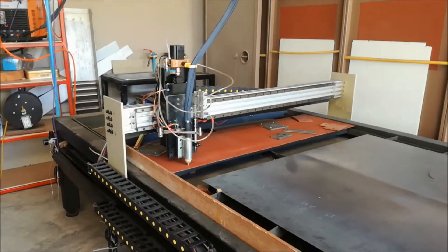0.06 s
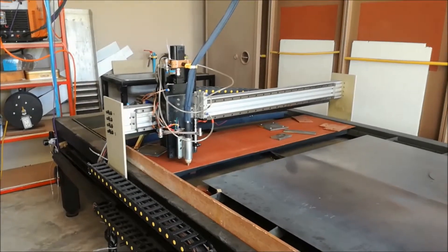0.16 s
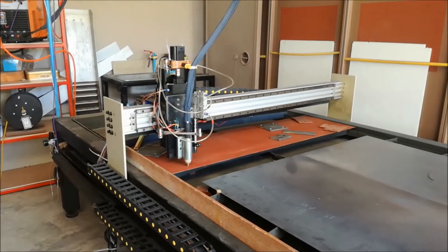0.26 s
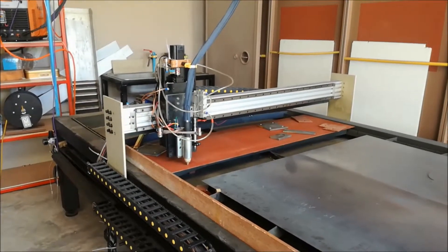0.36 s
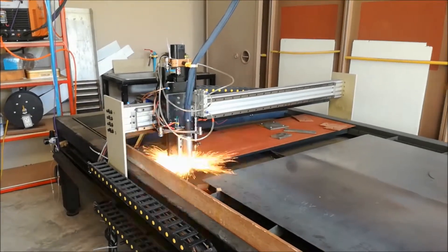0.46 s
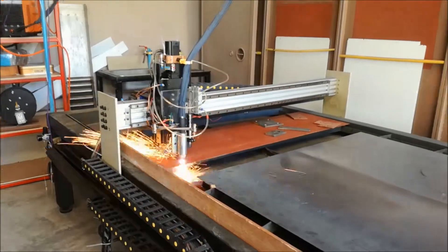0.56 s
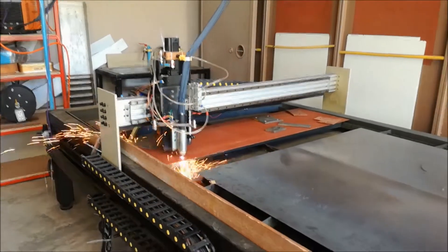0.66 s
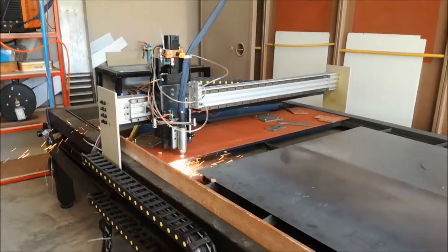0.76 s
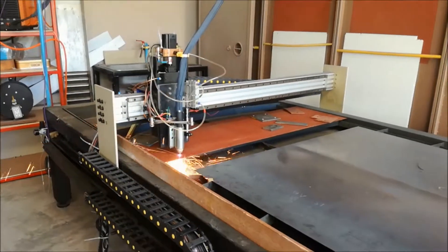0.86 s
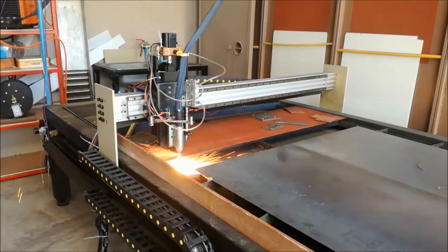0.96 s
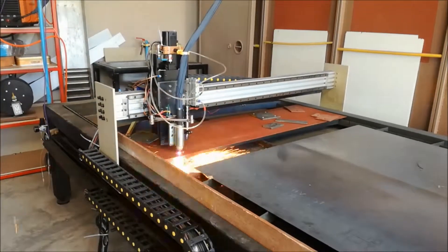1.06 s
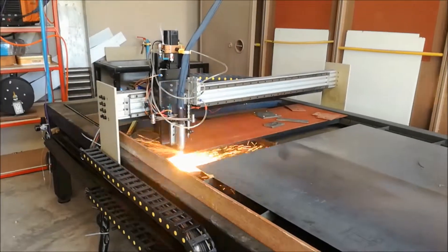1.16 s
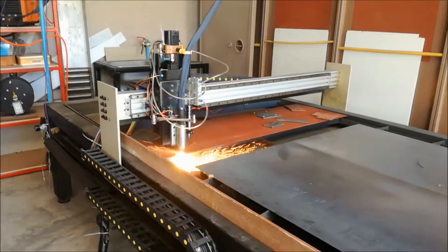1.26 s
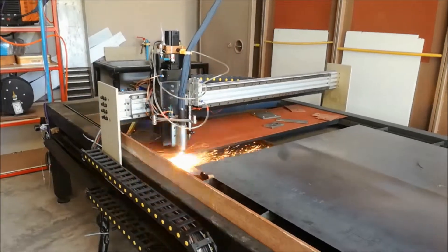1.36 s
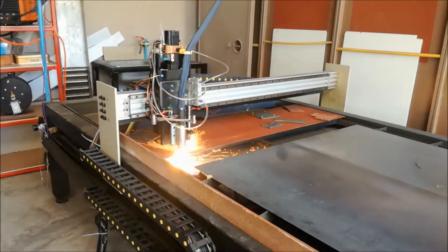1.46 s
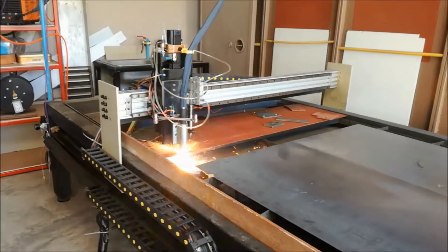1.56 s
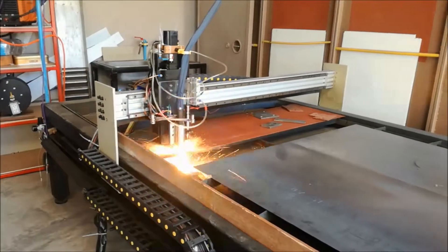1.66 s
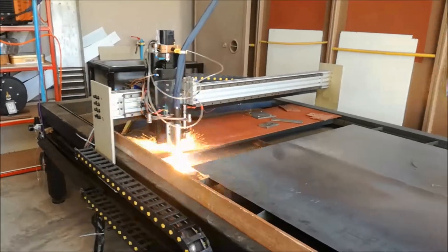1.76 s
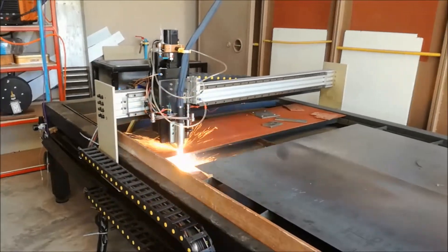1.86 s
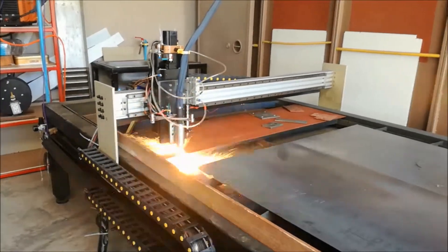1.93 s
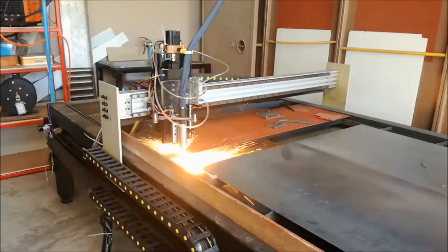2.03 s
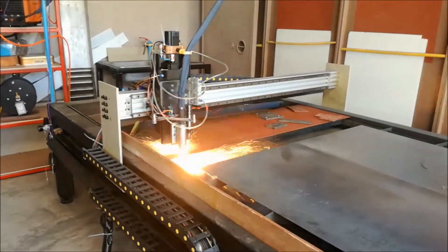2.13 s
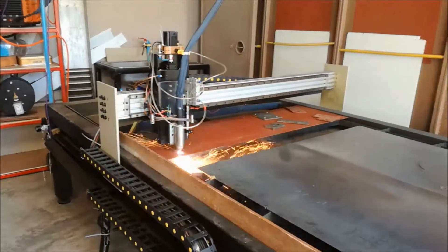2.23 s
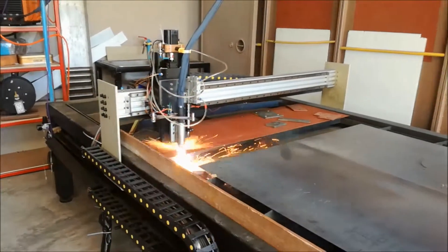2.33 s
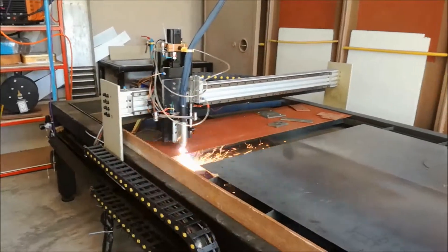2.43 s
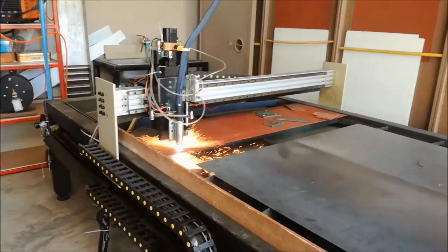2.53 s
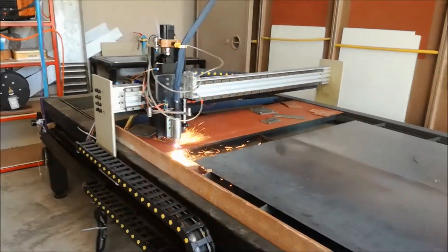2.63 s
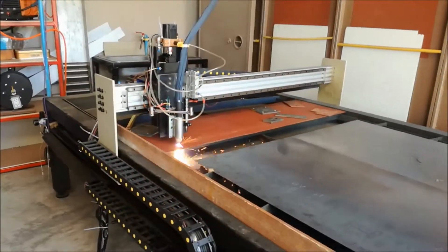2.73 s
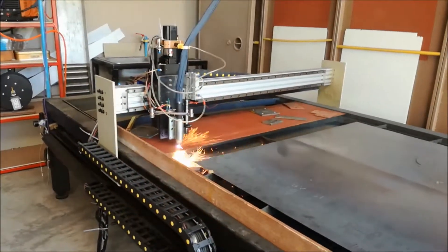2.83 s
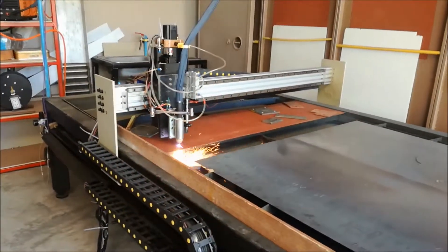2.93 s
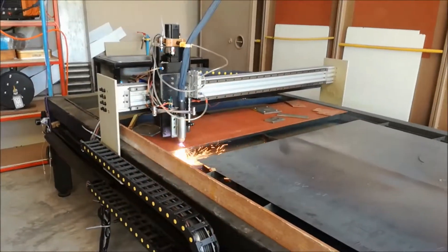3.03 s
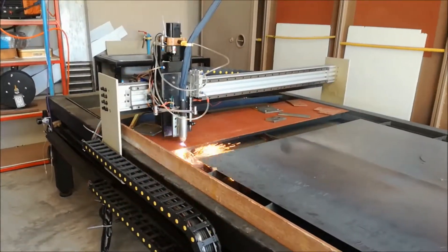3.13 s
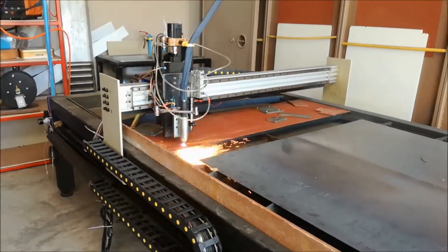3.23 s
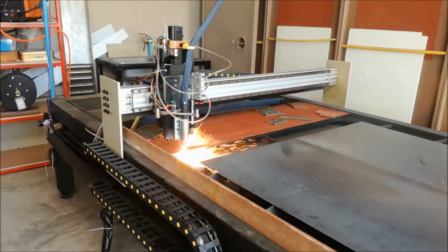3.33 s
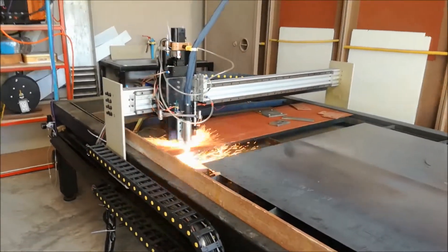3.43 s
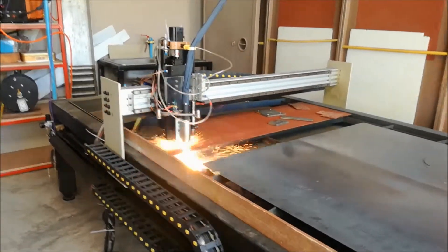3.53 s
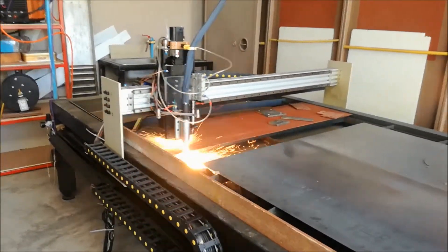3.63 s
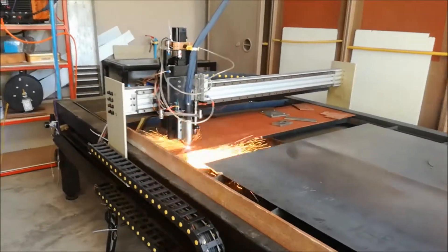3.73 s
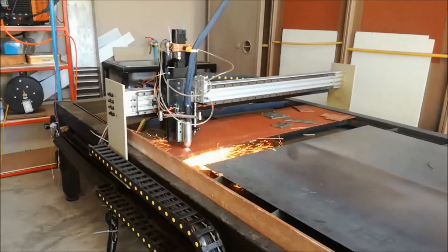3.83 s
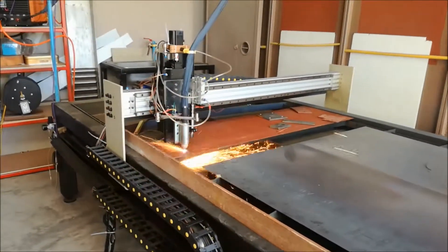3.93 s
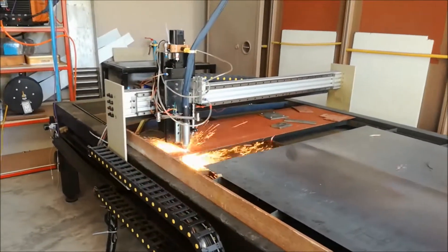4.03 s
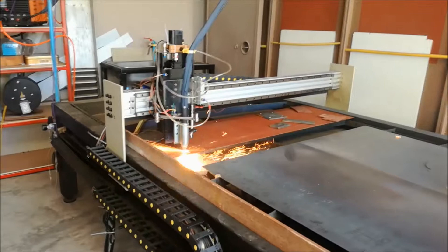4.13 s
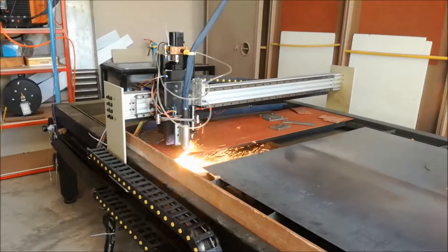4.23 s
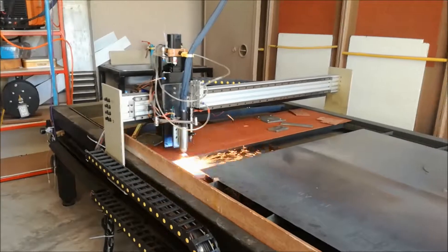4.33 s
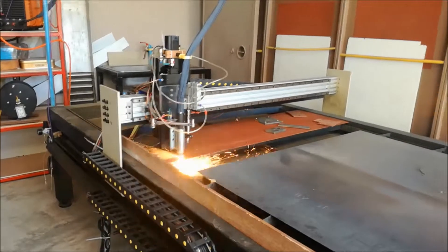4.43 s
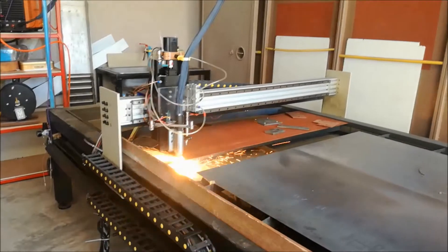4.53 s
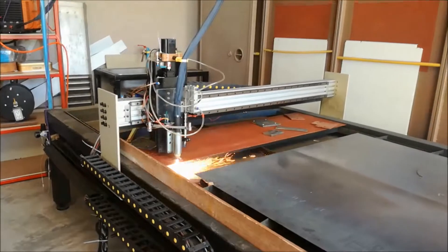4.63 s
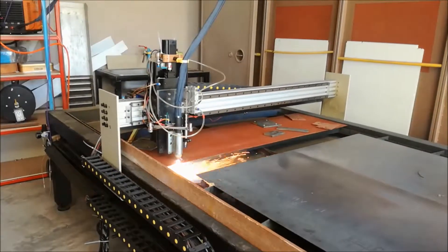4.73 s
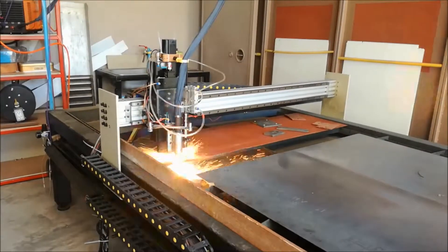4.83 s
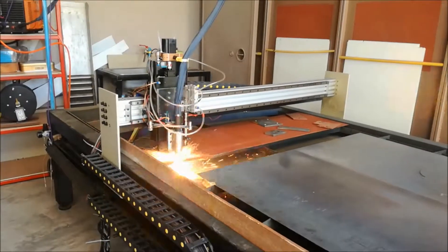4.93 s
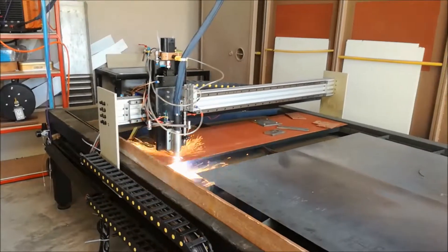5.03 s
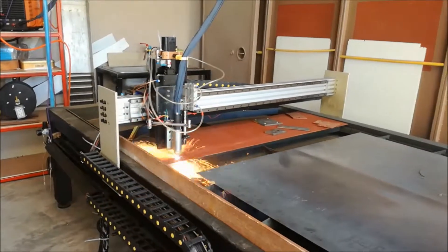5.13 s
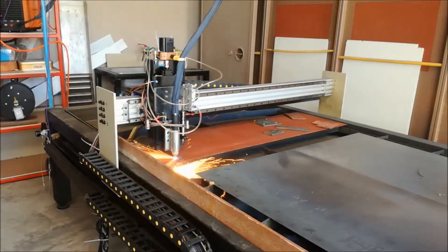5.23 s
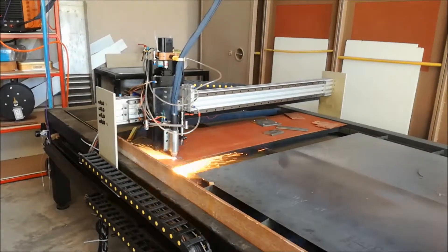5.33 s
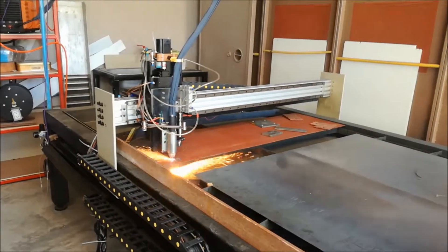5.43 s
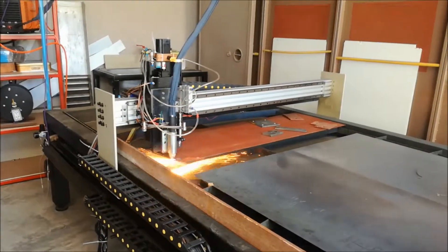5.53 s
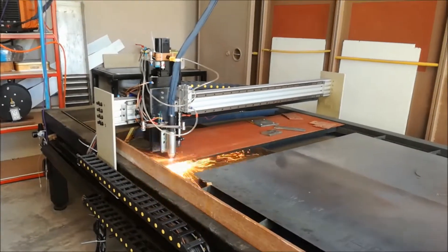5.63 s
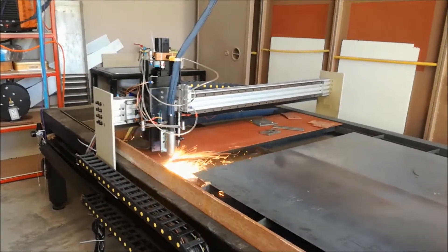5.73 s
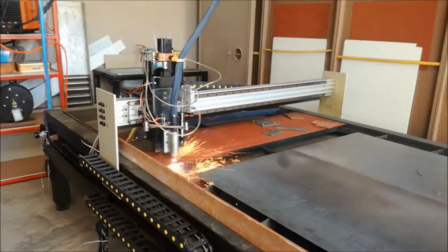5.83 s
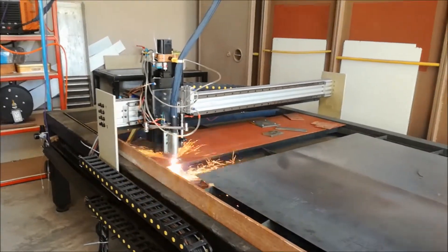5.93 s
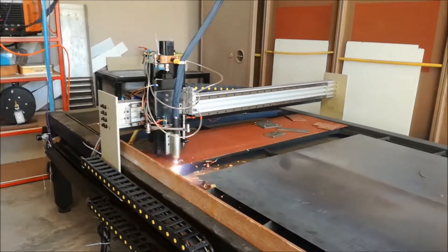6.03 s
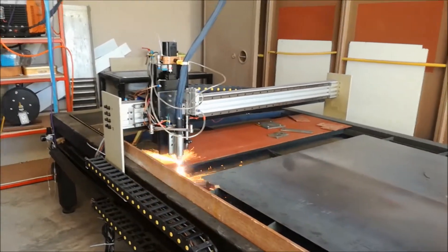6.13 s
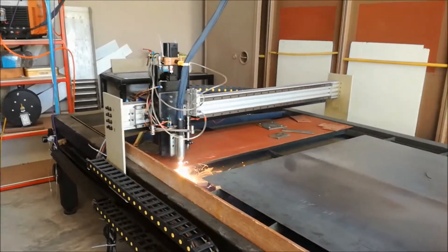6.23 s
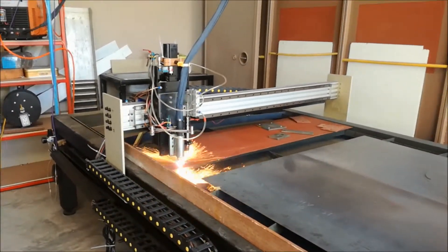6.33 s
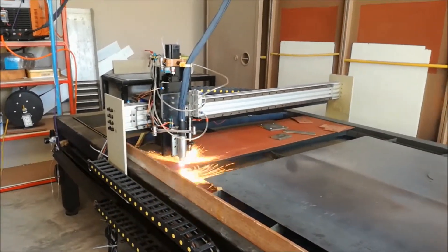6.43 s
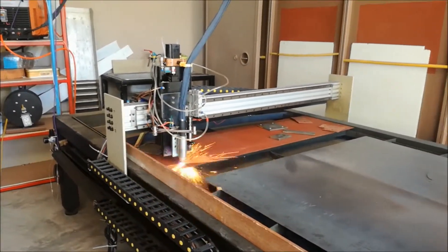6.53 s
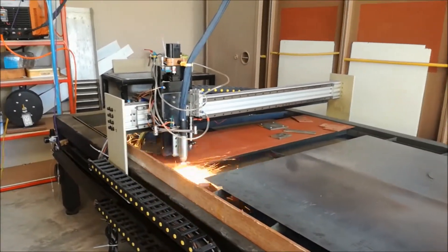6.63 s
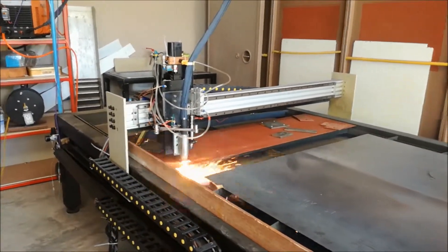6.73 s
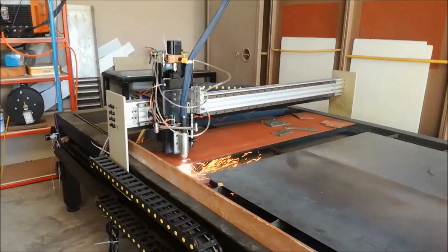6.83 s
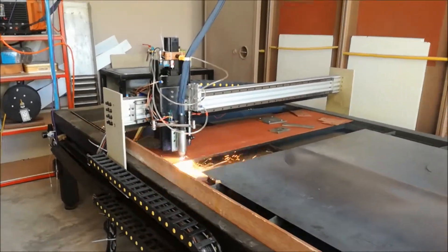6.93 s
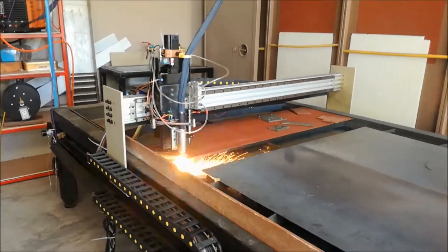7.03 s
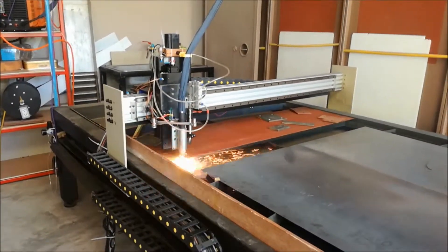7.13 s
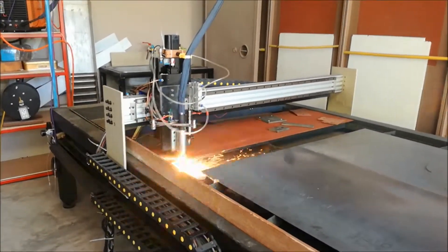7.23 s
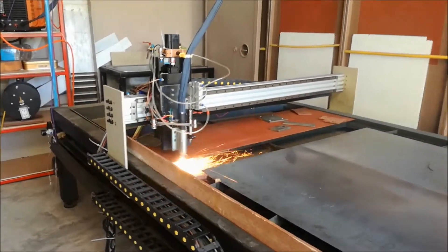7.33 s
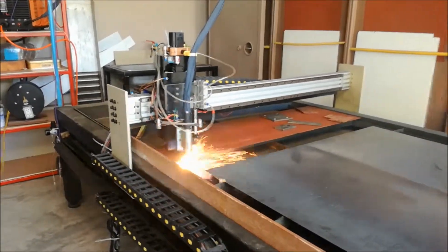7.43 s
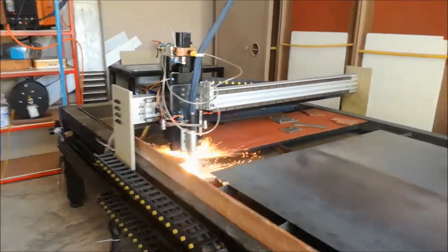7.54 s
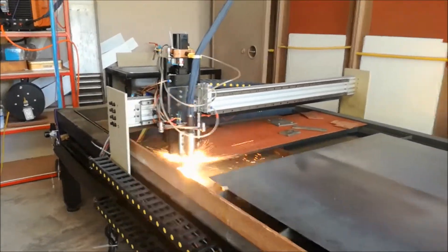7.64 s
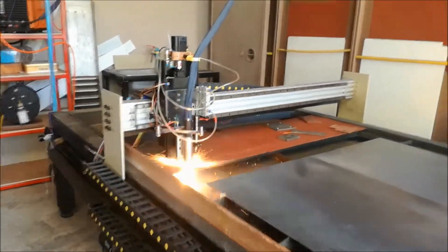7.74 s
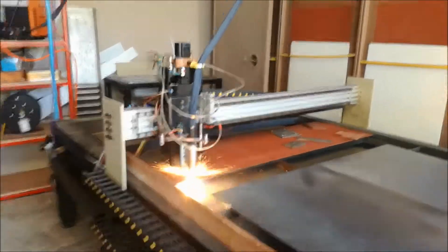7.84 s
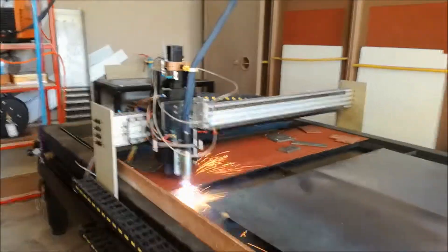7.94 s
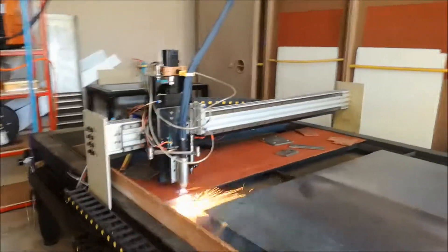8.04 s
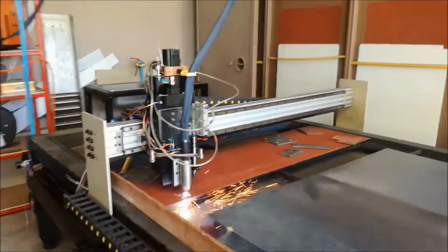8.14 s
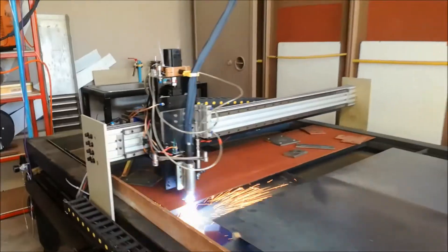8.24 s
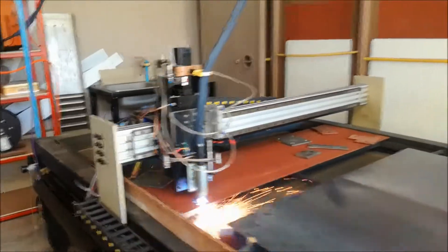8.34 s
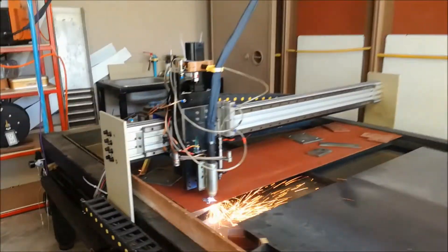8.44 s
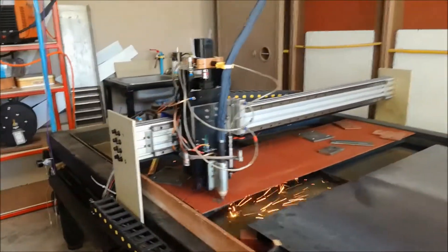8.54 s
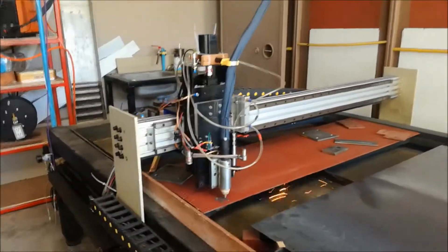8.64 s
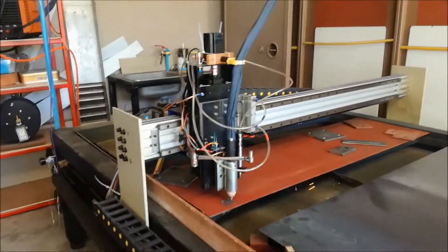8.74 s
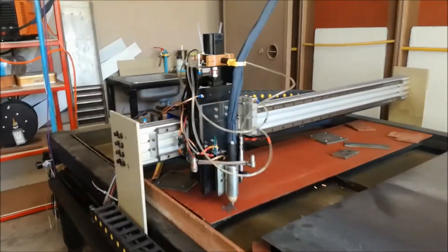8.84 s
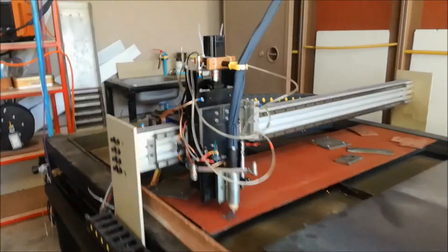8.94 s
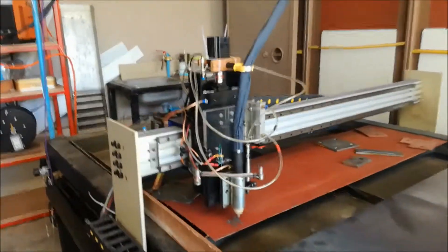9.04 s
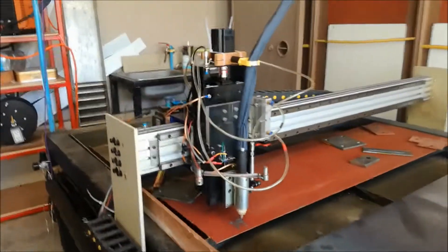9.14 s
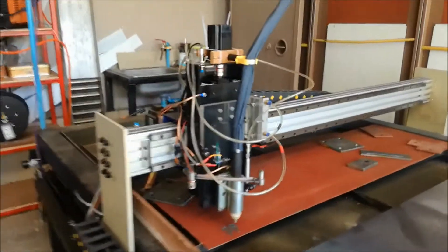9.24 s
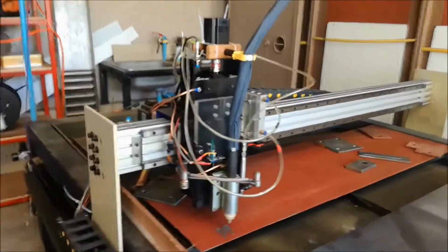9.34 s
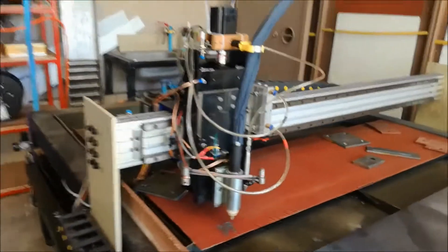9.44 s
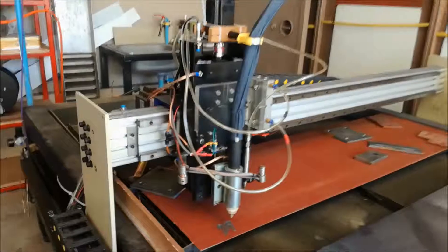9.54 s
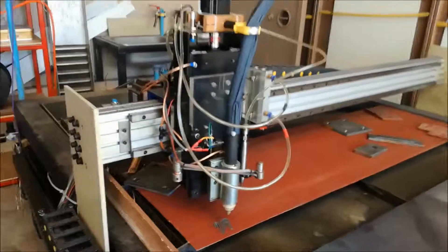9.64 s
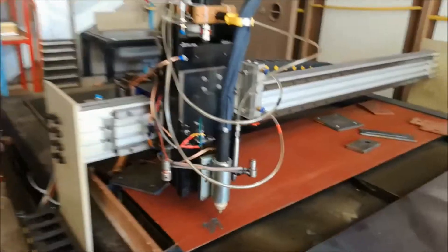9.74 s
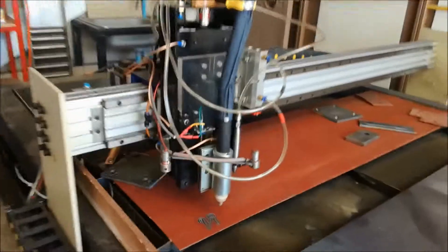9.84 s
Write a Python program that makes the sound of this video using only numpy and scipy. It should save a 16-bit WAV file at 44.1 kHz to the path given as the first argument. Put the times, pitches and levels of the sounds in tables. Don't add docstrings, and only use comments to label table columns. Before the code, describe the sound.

A quiet workshop murmurs with low rumble while stepper motors buzz around 180 Hz in short pulses. At 0.3 seconds an air valve ticks and puffs, immediately followed by the arc's knock and a burst of hiss that dips near 0.4 and surges to full force by 0.5. Until 8.4 seconds the plasma jet cuts steel: bright, dense, wide hiss and crisp fizz over a rough kerf roar, loudest around 2.3, repeatedly choked for fractions of a second. Gantry drone and rattle swell in uneven strokes, with fuzzy plate tones near 1 to 1.7 kHz and a faint motor whine near 7.6. At 8.42 the arc snaps out with a short falling-away whistle. Softer, steadier cooling air remains, growing from 9 to 9.7 before dropping, while dull low finger thumps hit the handheld stereo microphone, strongest around 8.75 to 8.9.

```python
import sys
import numpy as np
from scipy import signal
from scipy.fft import rfft, irfft, next_fast_len
from scipy.io import wavfile
from scipy.ndimage import uniform_filter1d, map_coordinates

SR = 44100
rng = np.random.default_rng(int(sys.argv[2]) if len(sys.argv) > 2 else 0)


def wrap_up_sound(samples):
    columns = np.atleast_2d(samples).T
    tamed = np.clip(columns, -1, 1)
    steps = np.round(tamed * 32767).astype(np.int16)
    wavfile.write(sys.argv[1], SR, steps)


def convert_level_to_amplitude(level_db):
    exponent = np.asarray(level_db, float) / 20
    return 10 ** exponent


N = 435708

# f/Hz, correlation/1
WIDE_ALIKE = [(60, .7), (130, .92), (290, 0.65), (640, 0.09), (1400, 0.65), (3000, 0.4), (7000, 0.45),
              (15000, 0.043)]
# t/s, level/dB
HOLDING = [
    (0, -63),
    (.08, -47),
    (.125, -56),
    (.26, -49),
    (.325, -54),
    (.35, -42),
    (.375, -48),
    (.51, -46),
    (.58, -60),
    (.65, -90),
]
STOP_SHARE = 0.45


def unit(x):
    return x / np.sqrt(np.mean(x ** 2) + 1e-20)


def along(points, hz):
    f, v = np.transpose(points)
    return np.interp(np.log(hz + 1), np.log(f + 1), v)


def curves(rows):
    s, *cols = np.transpose(rows)
    return [np.interp(np.arange(N) / SR, s, c) for c in cols]


def wobble(rate):
    knots = rng.standard_normal(int(N * rate / SR) + 4)
    return map_coordinates(knots, [np.arange(N) * rate / SR])


def filtered(x, response):
    m = next_fast_len(N + 8192)
    return irfft(rfft(x, m) * response(np.fft.rfftfreq(m, 1 / SR)), m)[..., :N]


def modes(table, f):
    return np.sqrt(sum((convert_level_to_amplitude(db) * f * w) ** 2 / ((c * c - f * f) ** 2 + (f * w) ** 2) for c, w, db in table))


def shape(points):
    ends = [(points[0][0] / 2, -120)], [(points[-1][0] * 2, -120)]
    return lambda hz: convert_level_to_amplitude(along(ends[0] + list(points) + ends[1], hz)) * (hz < 15730)


def ring(s, hz, db, t60, attack):
    t = np.clip(np.arange(N) / SR - s, 0, None)
    return convert_level_to_amplitude(db - 60 * t / t60) * np.sin(2 * np.pi * hz * t) * (1 - np.exp(-t / attack))


def puff(s, db, t60):
    t = np.arange(N) / SR
    return convert_level_to_amplitude(db - 60 * np.clip(t - s, 0, None) / t60) * (t >= s)


def bell(s, length, share, edge):
    t = np.arange(0, N, 64) / SR
    share = np.clip(share, .2, .8)
    return np.exp(-2 * np.abs((t - s) / (length * np.where(t < s, share, 1 - share))) ** edge)


def spread(x):
    return np.repeat(x, 64, axis=-1)[..., :N]


def room(x, drift_s, echo_db):
    # f/Hz, level/dB
    wall_echoes = [(150, -23), (500, -8), (1500, -6.5), (5000, -6.5), (9000, -8.5), (15000, -13)]
    hz, t, z = signal.stft(x, SR, nperseg=2048, noverlap=1365)
    knots = rng.standard_normal((2, 2, len(hz), int(N / SR / drift_s) + 3))
    place = t / drift_s
    at, part = place.astype(int), (place % 1) * np.pi / 2
    echo = knots[..., at] * np.cos(part) + knots[..., at + 1] * np.sin(part)
    echo_level = along(wall_echoes, hz) + echo_db
    response = 1 + convert_level_to_amplitude(echo_level + 5)[:, None] * (echo[0] + 1j * echo[1])
    even = np.hypot(1, convert_level_to_amplitude(echo_level))[:, None]
    return signal.istft(z * response / even, SR, nperseg=2048, noverlap=1365)[1][:, :N]


def rush(gain, alike, patchy_db, lag=0., spit=0., echo_db=0.):
    raw = rng.standard_normal((2, N))
    raw = raw * (1 + spit * (rng.random(N) < .01) * rng.random(N))
    z = signal.stft(raw, nperseg=512)[2]
    field = uniform_filter1d(rng.standard_normal(z.shape[1:]), size=6, axis=0)
    field = uniform_filter1d(field, size=10, axis=1)
    pair = signal.istft(z * convert_level_to_amplitude(patchy_db * unit(field)), nperseg=512)[1][:, :N]
    turn = lambda hz: np.arccos(np.clip(along(alike, hz), -1, 1)) / 2
    mid, side = filtered(pair, lambda hz: gain(hz) * [np.cos(turn(hz)), np.sin(turn(hz))])
    ramp = lambda hz: np.exp(1j * np.pi * lag * hz / SR * np.array([[-1], [1]]))
    return unit(room(filtered(np.array([mid + side, mid - side]), ramp), drift_s=.55, echo_db=echo_db))


def burning():
    # start t/s, end t/s
    fade_times = (8.41, 8.47)
    return np.interp(np.arange(N) / SR, fade_times, [1, 0])


def murmur():
    # f/Hz, density/dB
    shop_spectrum = [(300, 1.5), (450, -4.5), (550, -6.5), (850, -5.5), (1250, 0.5), (1800, -11),
                     (3000, -12.5), (5000, -20), (8000, -32), (12000, -55), (15000, -42)]
    # t/s, level/dB
    rumble_gain = [
        (0, 8),
        (.5, 12),
        (.6, 1),
    ]
    rumble = rush(shape([(25, -3), (50, 0), (90, 0)]), [(50, .6)], patchy_db=1.1)
    rumble = convert_level_to_amplitude(-72.5 + curves(rumble_gain)[0] + 3.5 * wobble(4)) * rumble
    return convert_level_to_amplitude(-57) * rush(shape(shop_spectrum), WIDE_ALIKE, patchy_db=.4) + rumble


def strokes():
    # middle t/s, length/s, drone level/dB, rattle level/dB
    outline = [(0.71, 1, -60, -43), (0.996, 0.38, -53, -48), (1.13, 0.11, -46, -44.5),
               (1.43, 0.67, -50, -42.5), (1.68, 0.18, -46.5, -63), (1.778, 0.18, -45, -41.5),
               (1.95, 0.19, -47, -44.5), (2.107, 0.31, -48, -40), (2.372, 0.5, -47.5, -42),
               (2.684, 0.4, -52, -45), (3.38, 0.99, -62, -51), (3.584, 0.66, -49, -49),
               (3.877, 0.28, -63, -48), (4.15, 0.36, -54.5, -62), (4.42, 1, -52, -48.5),
               (4.793, 0.17, -57, -45), (4.988, 0.55, -50, -45.5), (5.373, 0.49, -49, -40),
               (5.497, 0.31, -59, -39), (5.836, 0.45, -48.5, -47.5), (5.97, 0.1, -57, -63),
               (6.18, 0.32, -56, -46.5), (6.442, 0.41, -53.5, -42), (6.863, 0.85, -56.5, -60),
               (7.1, 0.22, -56, -45), (7.29, 0.17, -60, -45.5), (7.54, 0.84, -50.5, -48.5),
               (7.75, 0.71, -57, -49.5), (7.927, 0.28, -60, -49), (8.24, 0.57, -53.5, -43)]
    jolts = [
        (.44, 0.39, -49, -49),
        (8.45, 0.21, -47, -43.5),
    ]
    # middle t/s, length/s, drone loss/dB, rattle loss/dB
    corners = [(1.227, 0.059, 2, 2), (2.95, .3, -1, 7), (3.755, 0.086, 0, 4), (3.96, .07, 8, 3),
               (4.08, 0.25, -0.5, 12), (4.554, .16, 11, -1), (4.68, .08, 6, 2), (5.648, .12, -1, 0),
               (6.597, 0.17, 10, -2), (6.678, .12, 0, 4), (6.97, .14, 2, 5), (7.19, .1, 2, 1),
               (3.99, .08, .1, 7), (6.82, .12, 1, -3), (2.92, .12, .1, 4), (4.28, .12, -1, -2.5),
               (4.55, .2, .1, -1.5), (5.7, .2, -1, 1)]
    # drone level/dB, rattle level/dB
    creep = (-61, -55)
    # drone level/dB, rattle level/dB
    parked = (-65, -64.5)
    cutting = burning() * (np.arange(N) / SR > .2)
    rest = np.outer(creep, cutting) + np.outer(parked, 1 - cutting)
    swells = sum(np.outer(convert_level_to_amplitude([drone, rattle]), bell(s, length, STOP_SHARE, edge=1.97)) ** 2
                 for s, length, drone, rattle in outline + jolts)
    power = convert_level_to_amplitude(rest) ** 2 + spread(swells)
    power[0] += convert_level_to_amplitude(curves(HOLDING)[0]) ** 2
    halts = sum(np.outer([drone, rattle], bell(s, length, STOP_SHARE, edge=5.2))
                for s, length, drone, rattle in corners)
    drone_db, rattle_db = 10 * np.log10(power) - spread(halts)
    return drone_db, rattle_db - 2.5 - drone_db


def gantry():
    # f/Hz, width/Hz, level/dB
    frame_modes = [(105, 12, -3), (148.4, 20, 1.5), (190, 39, 2), (182, 22, -2), (250.5, 24, 0.5)]
    # f/Hz, density/dB
    moving_spectrum = [(200, -40), (300, -5), (350, -1.5), (400, -5.5), (450, -3), (680, 1.5), (860, -1),
                       (1100, -35)]
    # f/Hz, density/dB
    still_spectrum = [(200, -32), (300, -5), (400, -10), (550, -11), (800, -2), (1100, -7)]
    # start t/s, end t/s, f/Hz, level/dB
    whines = [
        (4.37, 4.52, 773, -50),
        (7.56, 7.85, 775.5, -47.5),
    ]
    # f/Hz, width/Hz, level/dB
    carriage_modes = [(254, 26, 0.5), (344, 47, -1), (538, 30, -10), (672, 14, -9)]
    # middle t/s, length/s, level/dB
    crossings = [(0.376, .1, -46), (0.535, 0.18, -49), (.95, 0.23, -59), (1.443, .1, -45),
                 (1.76, 0.15, -49), (1.92, 0.13, -46), (2.01, .12, -50), (2.17, .24, -48),
                 (2.343, .16, -48), (2.616, 0.24, -50), (3.17, .14, -68), (3.45, 0.18, -48),
                 (3.61, 0.2, -42.5), (3.914, .16, -53), (4.4, .24, -59), (4.8, 0.14, -52), (4.9, 0.19, -53),
                 (5.303, 0.15, -47), (5.455, 0.22, -46.5), (5.765, 0.11, -52), (5.953, 0.11, -47),
                 (6.12, 0.21, -51.5), (6.25, 0.089, -46), (6.415, 0.17, -43.5), (7.05, .16, -69),
                 (7.3, 0.12, -60), (7.602, .14, -60)]
    drone_db, rattle_db = strokes()
    t, lit = np.arange(N) / SR, burning()

    frame = lambda hz: modes(frame_modes, hz) ** 1.58
    drone = rush(frame, [(100, 0.92), (300, 0.93)], patchy_db=1.1) * convert_level_to_amplitude(0.2 + 1.8 * wobble(25))
    settling = np.interp(t, [.5, .62], [-9, 0])
    moving = rush(shape(moving_spectrum), WIDE_ALIKE, patchy_db=1.5)
    still = rush(shape(still_spectrum), WIDE_ALIKE, patchy_db=3.5)
    rattle = convert_level_to_amplitude(rattle_db + 1.0) * (np.sqrt(lit) * moving + np.sqrt(1 - lit) * still)
    shaking = convert_level_to_amplitude(drone_db) * (convert_level_to_amplitude(settling) * drone + rattle)

    hum = unit(filtered(rng.standard_normal(N), lambda hz: modes([(175.0, 58, 0)], hz) ** 2))
    windings = np.sin(2 * np.pi * np.cumsum(178 + 7 * wobble(12)) / SR)
    hum = convert_level_to_amplitude(curves(HOLDING)[0] + 1.2 * wobble(22)) * (0.73 * hum + 1.2 * windings)

    whine = 0
    for a, b, hz, db in whines:
        swell = np.interp(t, [a, a + 0.068, b, b + .015, b + .1], [0, 1, 1, .3, 0])
        whine = whine + convert_level_to_amplitude(db + 5) * swell * np.sin(2 * np.pi * hz * t)
    whine = whine * convert_level_to_amplitude(1.1 * wobble(23))

    runs = spread(sum(convert_level_to_amplitude(db) * bell(s, length, STOP_SHARE, edge=2.7) for s, length, db in crossings))
    rolling = rush(lambda hz: modes(carriage_modes, hz) ** 1.9, [(200, 0.99), (700, .4)], patchy_db=0.5)
    return runs * rolling + shaking + hum + whine


def plate_notes():
    # middle t/s, length/s, f/Hz, level/dB
    sung = [(1.0, .5, 1394, -45), (2.5, 1.2, 1395, -42.5), (3.4, .5, 1393, -42), (3.87, .15, 1214, -41.5),
            (4.3, .15, 985, -45), (4.5, .35, 1390, -44), (5.03, .1, 1500, -42), (5.41, 0.39, 1110, -40),
            (6.42, .14, 1710, -41), (6.7, .1, 1190, -45), (.03, .16, 1235, -59), (1.3, .6, 1082, -44),
            (1.75, .5, 995, -44), (2.2, .3, 1083, -42), (2.5, 0.27, 1197, -43), (8.37, .07, 3560, -31),
            (4.87, .12, 1090, -41), (5.47, .2, 1700, -42), (7.12, .14, 1200, -43)]
    t = np.arange(N) / SR
    phase, flutter = 2.1 * wobble(55), convert_level_to_amplitude(2.8 * wobble(35))
    return flutter * sum(convert_level_to_amplitude(db) * spread(bell(s, length, 0.43, edge=2.5))
                         * np.sin(2 * np.pi * hz * t + phase) for s, length, hz, db in sung)


def strike():
    # t/s, peak level/dB, t60/s
    valve_puffs = [
        (.1955, -70, .02),
        (.2955, -46, .01),
        (0.299, -42, 0.13),
    ]
    # t/s, level/dB, treble tilt/(dB per octave)
    clicks = [
        (.1955, -76, 12),
        (.2955, -46, 0),
    ]
    # f/Hz, level/dB, t60/s
    valve_modes = [(3774, -10, .06), (5959, -8, .05), (7187, 1, .034), (9082, 0, .018), (11680, -3, .017),
                   (13000, -6, .017), (14650, -10, .025)]
    # f/Hz, level/dB, t60/s
    torch_modes = [(1060, -37, 0.15), (1190, -43, .2), (1260, -43, 0.3), (1410, -37, 0.22),
                   (7278, -31, .16), (7730, -33, 0.26), (3750, -38, .12), (1620, -31, .08)]
    # t/s, level/dB, t60/s
    snap_burst = (8.416, -34, .015)
    # f/Hz, level/dB, t60/s
    crack_modes = [(450, -29, .008), (1100, -24, .007), (1900, -22, .007), (2900, -24, .006)]
    # t/s, f/Hz, level/dB, t60/s
    whistle = (8.421, 2697, -27, 0.13)
    hiss = filtered(rng.standard_normal((2, N)),
                    shape([(3500, -7), (5500, -6), (7200, -1), (9500, -11), (15000, -8)]))
    ticks = sum(puff(s, db - 3.0, t60) for s, db, t60 in valve_puffs) * unit(hiss)
    for s, db, tilt in clicks:
        for hz, level, t60 in valve_modes:
            ticks = ticks + ring(s, hz, db + level + tilt * np.log2(hz / 9000), t60, attack=0.00043)
    knock = sum(ring(.319, *mode, attack=0.0043) for mode in torch_modes)
    thud = filtered(rng.standard_normal(N),
                    shape([(120, 4), (300, 0), (600, 7), (1500, 0), (4000, -13), (7000, -25)]))
    snap = uniform_filter1d(puff(*snap_burst), size=90) * unit(thud)
    crack = sum(ring(8.4175, *mode, attack=0.00023) for mode in crack_modes)
    return ticks + knock + snap + crack + ring(*whistle, attack=.008)


def controls():
    # t/s, jet level/dB, fizz re jet/dB, kerf roar level/dB
    pierce = [
        (.19, -94, -7, -100),
        (.2, -86, -4, -100),
        (.314, -86, -5, -100),
        (0.318, -55, -8, -65),
        (.3215, -35.5, -12, -42),
        (.345, -35, -12, -35.5),
        (.396, -44.5, -6, -39),
        (.404, -34.5, -2, -38),
        (.47, -27.5, -3, -38.5),
        (.56, -26.5, -5.5, -33.5),
    ]
    cut_path = [(.62, -28, -6, -38), (1.0, -28.5, -3.5, -39), (1.6, -25.5, -0.5, -40.5),
                (2.3, -23, -4, -39.5), (2.9, -29, -5.5, -40.5), (3.6, -32, -6, -37.5),
                (4.6, -29, -1.5, -41.5), (5.4, -33, -5, -40.5), (5.9, -31, -4.5, -35),
                (6.8, -31.5, -5, -37), (7.4, -32.5, -1.5, -42), (8.0, -30.5, -4, -39.5),
                (8.41, -30.5, -3, -38)]
    # t/s, flow level/dB
    cooling = [
        (8.46, -36.5),
        (8.53, -42),
        (8.7, -40),
        (9.05, -38.5),
        (9.5, -34.5),
        (9.72, -34),
        (9.8, -39.5),
        (9.88, -40.5),
    ]
    # t/s, length/s, jet loss/dB, kerf loss/dB (negative: gain)
    chokes_and_surges = [(1.215, 0.48, 7.5, 1), (1.432, 0.089, 3, -5.5), (1.663, 0.67, 8.5, -1.5),
                         (1.99, 0.37, 5.5, -4), (2.124, 0.25, 5, -0.5), (2.292, 0.25, 5, -1.5),
                         (2.53, 0.42, 4.5, -1), (2.88, 0.08, 1, 2), (3.39, 0.07, 1, -2), (3.74, 0.15, 5, 6),
                         (3.998, 0.39, 6, 6), (4.225, 0.1, 4, 0), (4.447, 0.36, 8.5, -1.5), (4.652, 0.19, 2.5, 4),
                         (4.856, 0.33, 6.5, 0), (5.125, 0.18, 4, 1.5), (5.405, 0.36, 1, -3),
                         (5.614, 0.17, 5.5, 3), (5.878, 0.12, 1.5, 0.5), (6.144, 0.11, 3, 4),
                         (6.307, 0.1, 3.5, 4.5), (6.564, 0.24, 4.5, 5), (7.024, 0.25, 7, 0), (7.25, 0.24, 3, -4),
                         (7.4, 0.093, 2, -5), (7.654, 0.44, 5.5, 1.5), (7.793, 0.23, 3, 1), (8.167, 0.07, 1, -4),
                         (2.02, 0.079, -1.8, 6), (4.3, 0.051, 0.41, 1), (4.73, .06, -0.5, 0),
                   (5.04, .08, -0.2, -4), (5.76, 0.54, -0.46, 5), (1.9, 0.47, 0.14, -0.5),
                   (6.68, 0.069, -2.2, 1.5), (8.29, 0.11, -0.63, -1), (6.95, 0.4, -0.077, 2),
                   (3.2, .3, 0.35, -2.5), (3.38, .15, -0.48, -1), (5.95, .2, -1, -0.5),
                   (7.23, .15, .5, 1.5), (3.03, 0.23, 1.3, 1.5), (1.75, 0.18, -0.014, -1.5),
                   (8.5, .12, .5, -4), (4.07, .22, .1, 3), (6.85, .2, .1, 2.5), (0.98, 0.13, -0.69, -2.5),
                   (1.27, 0.13, -.3, -2.5), (1.57, .15, -.5, -2.5), (4.72, 0.16, -0.23, -2)]
    # level at middle flow/dB, gain per dB of flow/dB
    air_fizz = (-42, 0.05)
    air_edge = (-49.5, 0.6)
    air_gap = (-46, .95)
    jet_share = 0.75
    middle_flow_db = -38
    air = [(s, db, *(base + grow * (db - middle_flow_db) for base, grow in (air_fizz, air_edge, air_gap)))
           for s, db in cooling]
    arc = [(s, db, db + fizz, roar, -5 + jet_share * db + (1 - jet_share) * roar)
           for s, db, fizz, roar in pierce + cut_path]
    jet_db, fizz_db, roar_db, gap_db = curves(arc + air)
    jet_loss, kerf_loss = spread(sum(np.outer([jet, kerf], bell(s, length, 0.44, 1.71))
                                     for s, length, jet, kerf in chokes_and_surges))
    gap_loss = jet_share * jet_loss + (1 - jet_share) * kerf_loss
    jet_db = jet_db - jet_loss
    fizz_db = fizz_db - 1.44 * jet_loss
    return jet_db, fizz_db - jet_db, roar_db - kerf_loss - jet_db, gap_db - gap_loss - jet_db


def torch():
    # f/Hz, density/dB
    arc_spectrum = [(1760, -45), (2900, -1.5), (3500, -2.5), (4600, 0.5), (6620, -1), (10000, -9),
                    (13000, -14.5), (22000, -120)]
    air_spectrum = [(1760, -33), (3000, -10.5), (3250, -9.5), (3900, -11.5), (5400, -9), (6450, -12),
                    (7850, -11.5), (10000, -19.5), (13000, -28), (22000, -120)]
    fizz_spectrum = [(6000, -6.5), (9000, -5), (12000, -5), (15700, -0.5), (17000, -6.5)]
    gap_spectrum = [(1500, -36), (1900, -3.5), (2300, 1), (2700, 2.5), (3000, -7), (3600, -34)]
    roar_spectrum = [(400, -26.5), (700, -15.5), (860, -11.5), (930, -4), (1400, -3), (1750, -3.5),
                     (2100, -7), (2600, -39), (4000, -36)]
    breeze_spectrum = [(500, -43), (780, -11), (1000, -8.5), (1500, -2.5), (2000, -3), (2600, -19)]
    # f/Hz, correlation/1
    air_alike = [(1500, 0.62), (4000, 0.63), (9000, 0.53)]
    # f/Hz, width/Hz, level/dB
    nozzle_modes = [(4750, 640, 0), (5540, 460, 1)]
    core_modes = [(6260, 2300, -1)]
    impinge_modes = [(3490, 700, 0), (4070, 300, -3.5)]
    plate_modes = [(684.4, 10.6, 9), (923, 13, 3), (995, 18, 2), (1086, 27, 2), (1202, 38, 4),
                   (1387, 35, 5), (1562, 24, 3.5), (1717, 38, 4), (1970, 25, 0.5)]
    # t/s, extra share/1
    jet_speed = [(.3, .01), (.7, -0.078), (1, 0.084), (1.6, .05), (2.0, .12), (2.45, 0.15), (2.9, .2),
                 (3.3, 0.066), (3.8, -0.1), (4.2, .05), (4.7, -0.084), (5.3, -0.051), (5.9, 0.032),
                 (6.4, -.12), (7.0, 0.03), (7.4, .03), (7.9, .03), (8.4, -.02)]
    # t/s, level re jet/dB
    standoff = [(.3, -9), (.75, -7), (1.3, -13), (1.9, -16), (2.4, -13), (3.0, -16), (3.7, -10.5),
                (4.6, -13.5), (5.4, -9.5), (6.0, -8.5), (6.3, -5.5), (6.6, -11.5), (7.4, -10), (8.0, -11.5),
                (8.35, -7.5)]
    # t/s, level/dB
    freedom = [(.3, -0.5), (1, 5.5), (1.9, -2), (2.4, 8), (3, 4), (3.5, 3), (3.8, 0.5), (5.3, 2.5), (6, -6),
               (7.2, -2.5), (8.4, -2)]
    jet_db, fizz_db, roar_db, gap_db = controls()
    lit = burning()
    flow_db = jet_db + lit * (.5 * wobble(8.6) + 0.35 * wobble(30)) + 0.37 * wobble(60)

    arc = rush(shape(arc_spectrum), WIDE_ALIKE, patchy_db=0.5, lag=1.66, spit=2.5)
    arc = arc + curves(jet_speed)[0] * filtered(arc, lambda hz: modes(core_modes, hz))
    tone = rush(lambda hz: modes(impinge_modes, hz) ** 2, WIDE_ALIKE, patchy_db=1.5, lag=1.4)
    arc = arc + convert_level_to_amplitude(curves(standoff)[0] + 1.4 * wobble(7)) * tone
    air = rush(shape(air_spectrum), air_alike, patchy_db=1.0, lag=-1.45, spit=1.0, echo_db=-3)
    song = unit(filtered(air, lambda hz: modes(nozzle_modes, hz) ** 2))
    air = air + convert_level_to_amplitude(-11.0 + 1.2 * np.clip(jet_db + 32.0, -20, 3)) * song
    jet = convert_level_to_amplitude(4.0) * (np.sqrt(lit) * arc + np.sqrt(1 - lit) * air)

    fizz = convert_level_to_amplitude(fizz_db + 5.0) * rush(shape(fizz_spectrum), WIDE_ALIKE, patchy_db=1.26, spit=2.0)
    gap = convert_level_to_amplitude(gap_db + 1.5) * rush(shape(gap_spectrum), WIDE_ALIKE, patchy_db=0.87, lag=6.9, spit=2.2)

    kerf = rush(shape(roar_spectrum), WIDE_ALIKE, patchy_db=1.0, lag=1.3)
    breeze = rush(shape(breeze_spectrum), air_alike, patchy_db=-0.2)
    drive = rng.standard_normal((2, N)) + 1.36 * rng.standard_normal(N)
    plate = unit(filtered(drive, lambda hz: shape(roar_spectrum)(hz) * modes(plate_modes, hz) ** 1.33))
    kerf = convert_level_to_amplitude(-2.0) * (kerf + convert_level_to_amplitude(-6.5 + curves(freedom)[0] + 0.89 * wobble(7.2)) * plate)
    roar = convert_level_to_amplitude(roar_db + 3.0 + 0.55 * wobble(9)) * (np.sqrt(lit) * kerf + np.sqrt(1 - lit) * breeze)
    return convert_level_to_amplitude(flow_db) * (jet + fizz + gap + roar)


def handling():
    # t/s, peak level/dB, f/Hz, t60/s
    bumps = [(8.408, -42, 119, 0.12), (8.429, -40, 159, 0.14), (8.485, -52, 190, .14),
             (8.618, -43.5, 99.6, 0.12), (8.645, -45, 80, .08), (8.70, -47, 90, .07),
             (8.754, -37, 85, 0.06), (8.762, -42, 175, .07), (8.79, -43, 70, .07), (8.856, -35, 98, 0.077),
             (8.879, -39, 70.0, 0.098), (8.959, -51, 61.9, 0.12), (8.999, -47, 56.5, 0.1),
             (9.039, -44, 61.9, 0.14), (9.119, -49, 40.4, 0.12), (9.199, -60, 51.1, 0.12),
             (9.319, -60, 170, 0.12), (9.481, -42, 66, 0.13), (9.556, -44, 70, 0.09),
             (9.615, -47, 60, 0.09), (9.66, -49, 72.7, 0.09), (9.735, -49, 60, 0.1), (9.748, -52, 160, .07)]
    push = sum(ring(s, hz, db, t60, attack=0.0034) for s, db, hz, t60 in bumps)
    fade = sum(puff(s, db - 8.5, 2.1 * t60) for s, db, hz, t60 in bumps)
    return push + fade * rush(shape([(30, -3), (120, 0), (250, -17)]), [(50, 0.67)], patchy_db=3.5)


def scene():
    return murmur() + gantry() + plate_notes() + strike() + torch() + handling()


def top_cut(x):
    return signal.sosfilt(signal.butter(12, 15730, fs=SR, output="sos"), x)


def record(dry):
    # f/Hz, level/dB
    port_tilt = [(1000, 0), (2000, -1), (4000, -3), (6500, -1.5), (8000, 4), (10000, 8.5), (12500, 7.5),
                 (15500, 1.5)]
    ports = filtered(dry, lambda hz: convert_level_to_amplitude(along(port_tilt, hz) * np.array([[.5], [-.5]])))
    return top_cut(ports)


dry = scene()
out = record(dry)
wrap_up_sound(out)
```